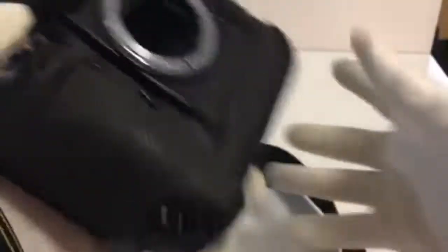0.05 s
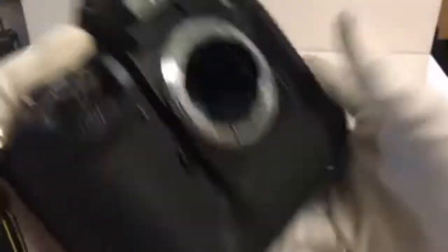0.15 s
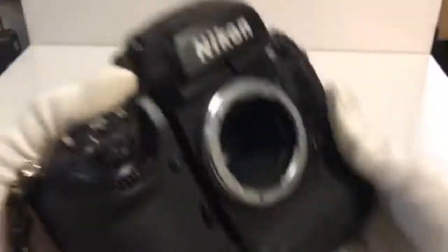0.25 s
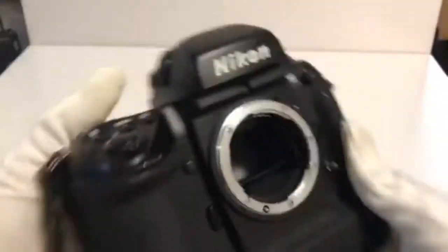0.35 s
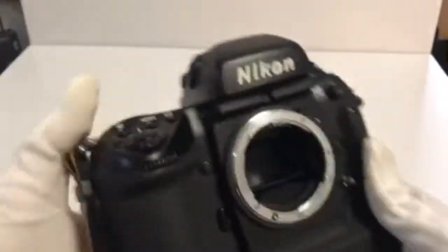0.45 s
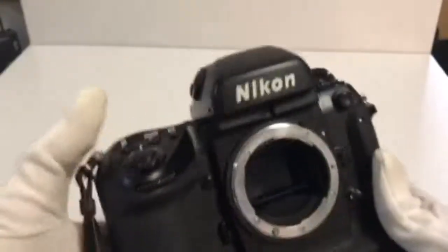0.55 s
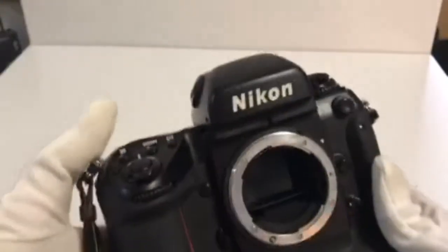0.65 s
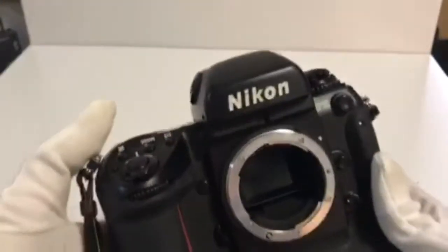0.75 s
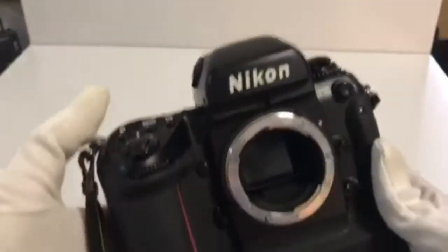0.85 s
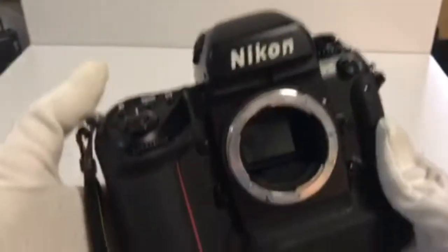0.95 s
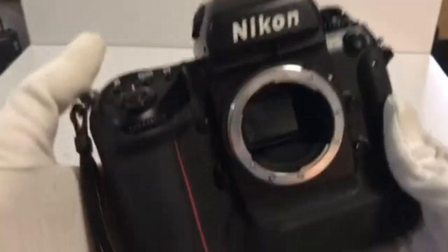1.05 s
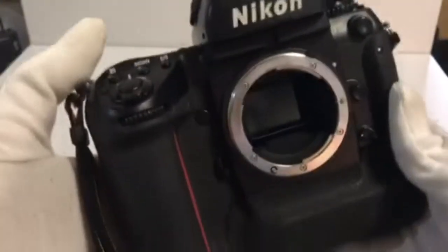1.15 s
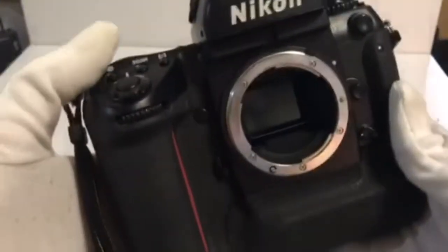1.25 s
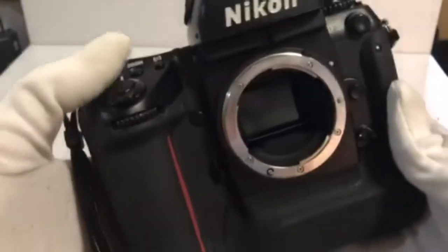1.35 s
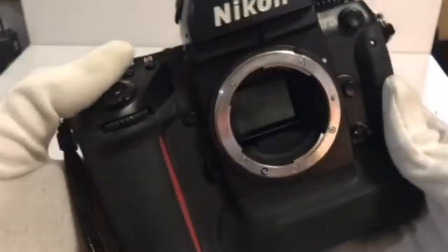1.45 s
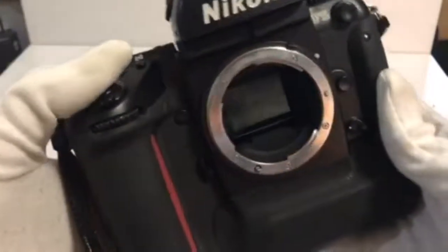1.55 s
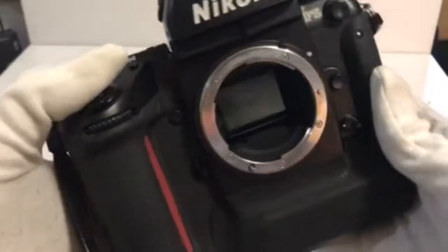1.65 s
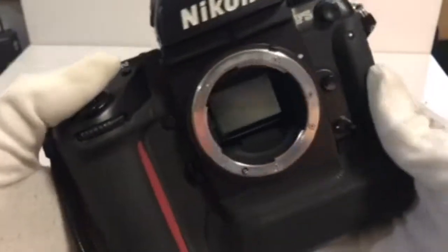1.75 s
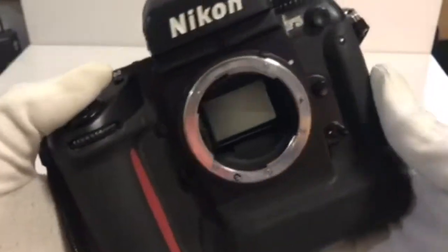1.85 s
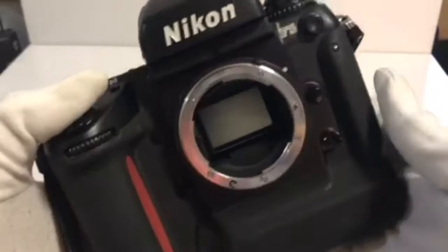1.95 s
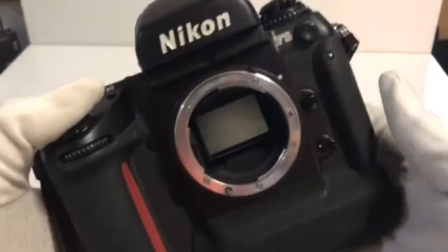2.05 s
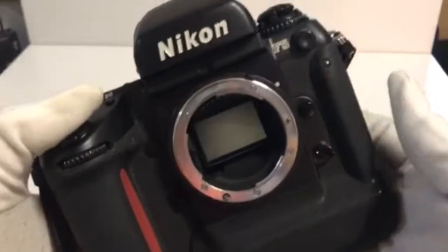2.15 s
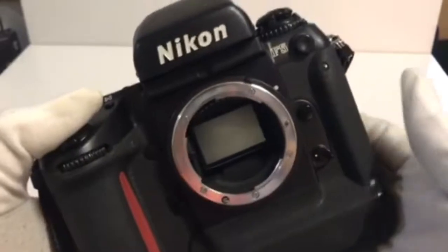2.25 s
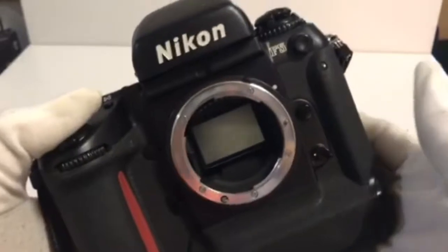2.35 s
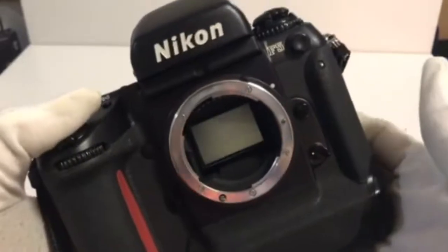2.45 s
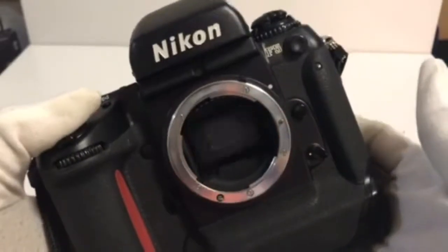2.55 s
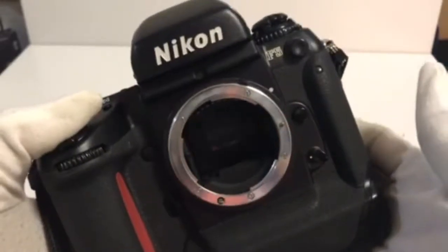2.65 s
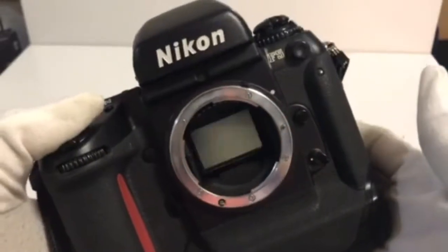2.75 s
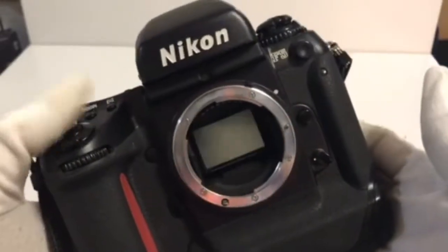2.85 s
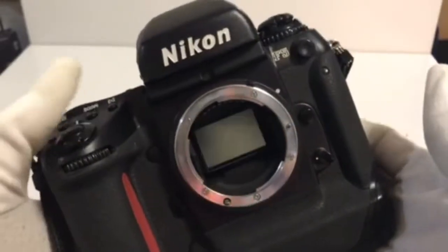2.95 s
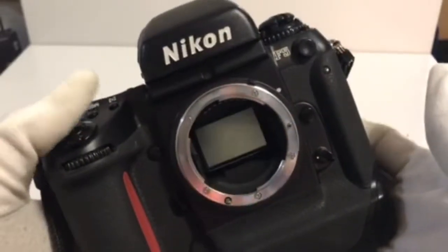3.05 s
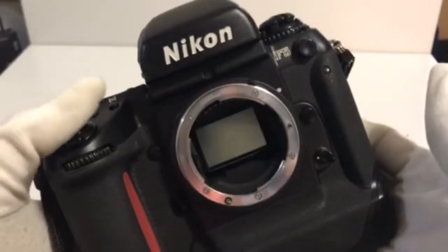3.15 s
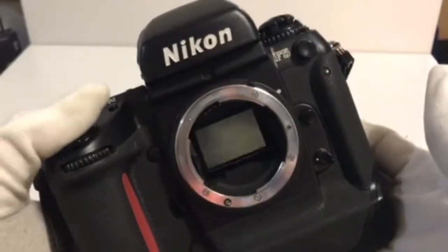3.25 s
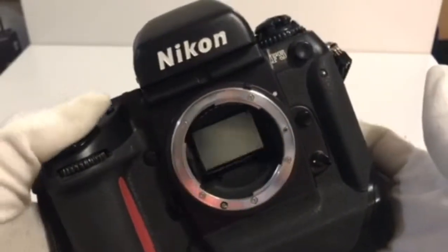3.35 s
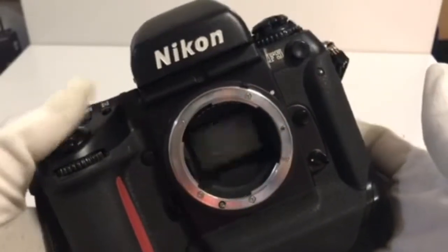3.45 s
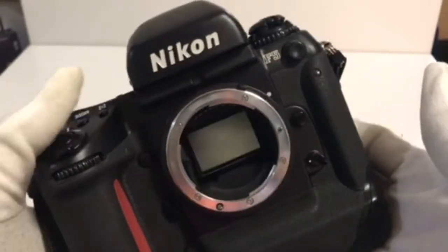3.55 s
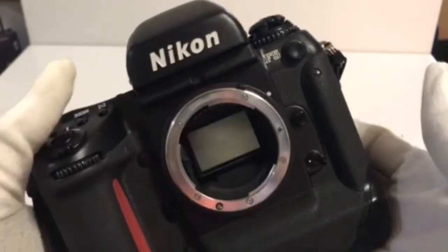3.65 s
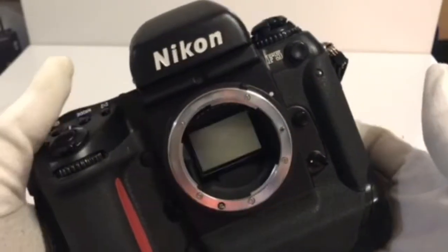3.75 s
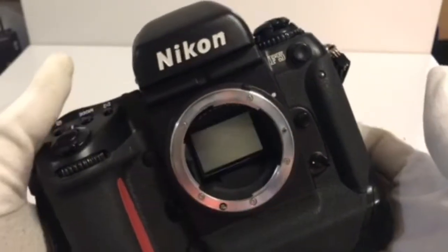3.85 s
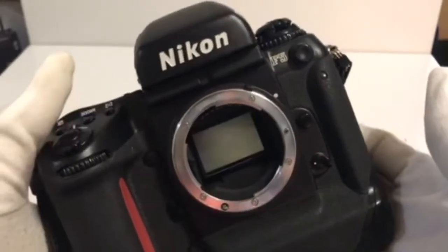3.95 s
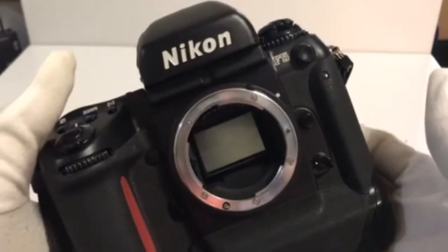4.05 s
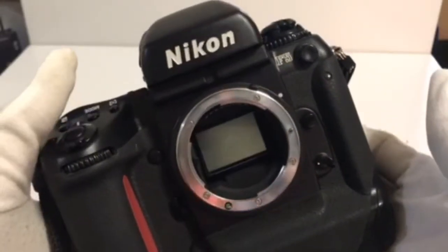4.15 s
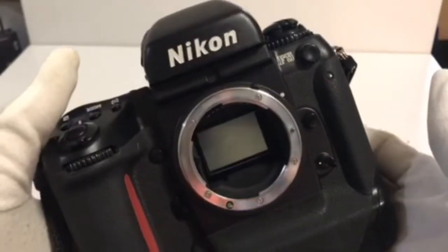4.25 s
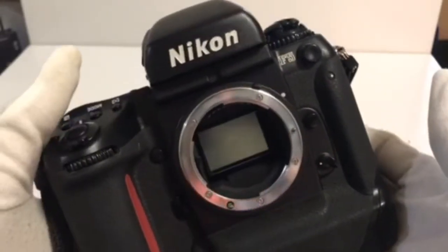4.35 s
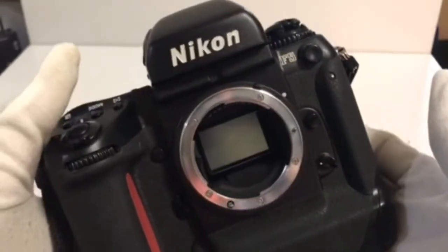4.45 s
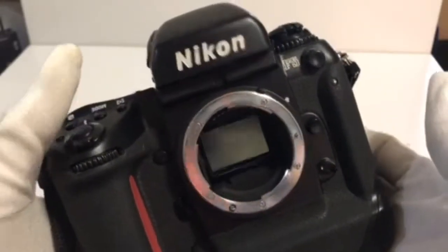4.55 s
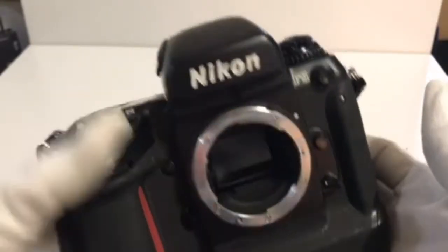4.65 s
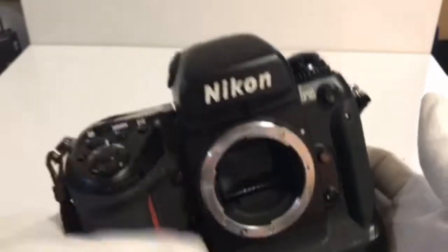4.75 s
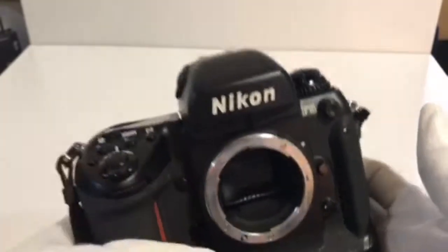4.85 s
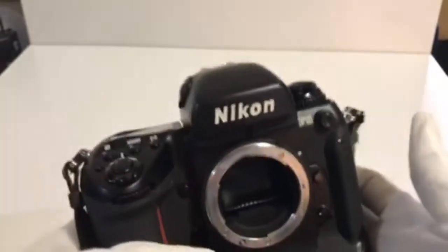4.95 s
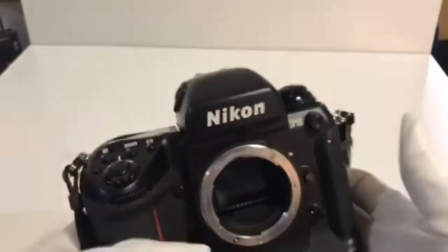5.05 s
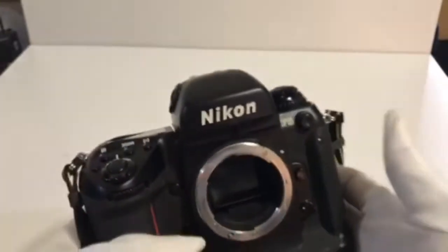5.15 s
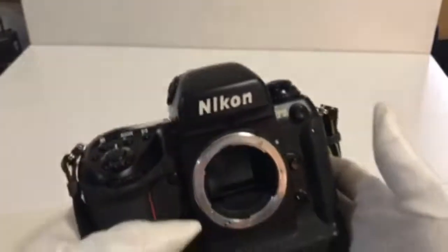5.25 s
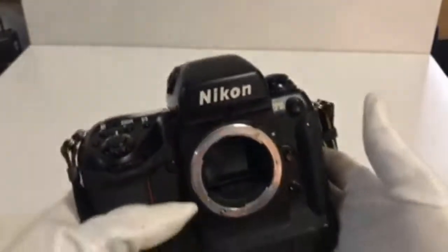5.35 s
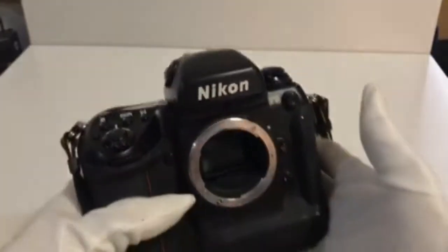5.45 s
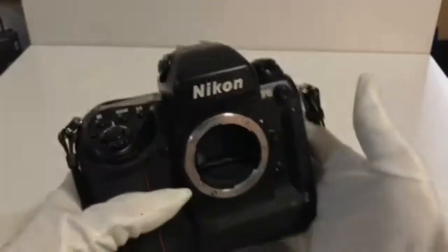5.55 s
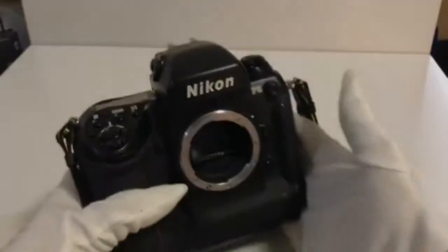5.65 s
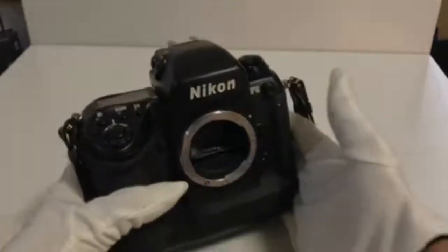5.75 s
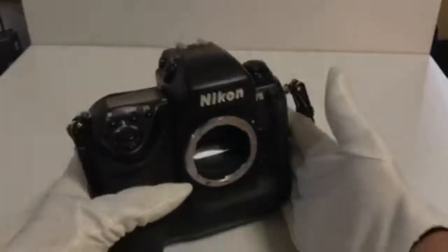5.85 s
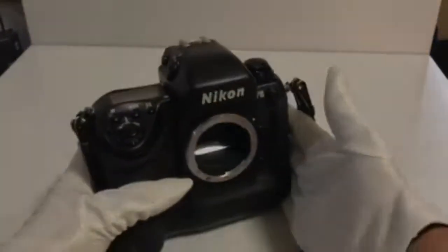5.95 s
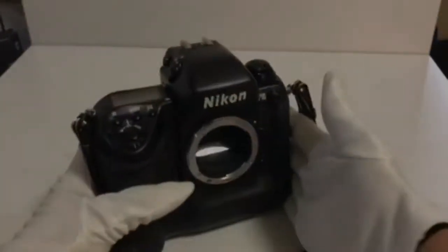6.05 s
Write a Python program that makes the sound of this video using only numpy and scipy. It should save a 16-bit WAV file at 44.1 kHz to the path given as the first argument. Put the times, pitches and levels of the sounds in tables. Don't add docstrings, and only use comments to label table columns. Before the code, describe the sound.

A film camera is handled by gloved hands very near the microphone, over rumbling air and faint hiss. Early rustling and a firm dull knock give way to quiet. A tiny button tick leads into four loud mechanical shutter-and-mirror clatters in quick succession; half a second later come two more. Quiet returns, then soft rubbing, bright little strap-lug ticks and a low thud onto the table, with slight room echo.

```python
import sys
import numpy as np
from scipy import signal
from scipy.fft import rfft, irfft, next_fast_len
from scipy.io import wavfile
from scipy.ndimage import uniform_filter1d

SR = 44100
rng = np.random.default_rng(int(sys.argv[2]) if len(sys.argv) > 2 else 0)


def gain_from_db(level_db):
    decades = np.asarray(level_db, float) / 20
    return 10 ** decades


def persist_wave(psi):
    counts = np.round(np.clip(psi, -1, 1) * 32767).astype(np.int16)
    wavfile.write(sys.argv[1], SR, np.atleast_2d(counts).T)


N = 269010


def rms_one(x):
    return x / np.sqrt(np.mean(x ** 2) + 1e-20)


def band(x, low_hz, high_hz):
    return signal.sosfilt(signal.butter(2, [low_hz, min(high_hz, .45 * SR)], "band", fs=SR, output="sos"), x)


def highpass(x, order, hz):
    return signal.sosfilt(signal.butter(order, hz, "high", fs=SR, output="sos"), x)


def ring(clicks, hz, t60):
    r, w = gain_from_db(-60 / (t60 * SR)), 2 * np.pi * hz / SR
    return signal.lfilter([0, np.sin(w)], [1, -2 * r * np.cos(w), r * r], clicks + 1e-18)


def narrow(hz, width_hz):
    return rms_one(ring(rng.standard_normal(N), hz, np.log(1000) / np.pi / width_hz))


def flicker(low_hz, high_hz):
    return rms_one(band(rng.standard_normal(N), low_hz, high_hz))


# (pitch [Hz], level [dB per Hz])
AIR = [(15, -33), (59, 0.5), (217, -18.5), (734, -32.5), (2160, -34), (4490, -42.5), (5000, -46.5),
       (16000, -49)]
# (pitch [Hz], width [Hz], level [dB])
AIR_HUMPS = [(350, 59, -67.5), (1065, 400, -68)]
# (pitch [Hz], width [Hz])
DUCTS = [(55, 2), (119, 2.4)]
# (time [s], rumble level [dB])
GUSTS = [(0.0, -47.5), (0.28, -46.5), (0.31, -52.5), (0.76, -56), (0.82, -44.5), (1.38, -53.5), (1.49, -66),
         (1.68, -46), (2.5, -50), (2.65, -55), (3.83, -48.5), (3.96, -59), (3.99, -48), (4.29, -45),
         (4.4, -51.5), (4.78, -44.5), (4.9, -56), (5.9, -50)]
# (width [Hz], level [dB])
WHINE = (49, -83.5)
AIR_DB, WHINE_HZ = -56, 4480
HUM_DB, HUM_SWAY_DB = -55.5, 2


def room_tone():
    hz = np.maximum(np.arange(N // 2 + 1) * SR / N, 1)
    air_hz, air_db = np.transpose(AIR)
    colour = gain_from_db(np.interp(np.log(hz), np.log(air_hz), air_db))
    out = gain_from_db(AIR_DB) * rms_one(irfft(rfft(rng.standard_normal(N)) * colour, N))
    for hump_hz, width_hz, db in AIR_HUMPS:
        out += gain_from_db(db) * narrow(hump_hz, width_hz)
    rumble_db = np.interp(np.arange(N) / SR, *np.transpose(GUSTS))
    hum_db = HUM_DB + HUM_SWAY_DB * flicker(1.3, 6.1)
    for level_db, (centre_hz, width_hz) in zip([rumble_db, hum_db], DUCTS):
        tone = narrow(centre_hz, width_hz)
        swell = np.sqrt(uniform_filter1d(tone ** 2, size=3000))
        out += gain_from_db(level_db) * tone / swell
    whine_width_hz, whine_db = WHINE
    return out + gain_from_db(whine_db) * narrow(WHINE_HZ, whine_width_hz)


ROOM_T60_S, WALL_CUT_HZ = .22, 5000


def room(x):
    size = next_fast_len(N + SR)
    w = 2 * np.pi * np.arange(size // 2 + 1) / size
    dull = 1 / (1 + 1j * w * SR / (2 * np.pi * WALL_CUT_HZ)) ** .25
    echo = 0
    for lag in (rng.uniform(0.021, 0.045, 18) * SR).astype(int):
        loop = gain_from_db(-60 * lag / SR / ROOM_T60_S) * dull * np.exp(-1j * w * lag)
        echo = echo + loop / (1 - loop)
    return irfft(rfft(x, size) * echo, size)[:N]


DUCK_S, DUCK_DB = .011, -25


def duck(floor):
    gain = np.ones(N)
    first_touch_s = RELEASE[1][0][0]
    for first in (0, LAST_FRAMES[0] + 1):
        start = round((FRAMES[first][0] + first_touch_s - .004) * SR)
        gain[start - round(DUCK_S * SR):start] = gain_from_db(DUCK_DB)
    hiss = signal.sosfiltfilt(signal.butter(2, 1500, "high", fs=SR, output="sos"), floor)
    return floor + (uniform_filter1d(gain, size=60) - 1) * hiss


# (time of firmest touch [s], rise [s], fall [s], rub level [dB], fine rustle over rub [dB])
STROKES = [(.03, 0.085, 0.094, -68, 0), (.235, 0.0091, 0.053, -72.5, 5.5), (.3, .05, 0.033, -71, -13),
           (.45, 0.086, 0.13, -61.5, 2), (.62, 0.017, 0.036, -71, -1), (.82, .04, 0.026, -77, -7),
           (.92, .03, .04, -78, -5), (1.02, .015, 0.13, -78, -20), (1.41, 0.034, .07, -83.5, 7),
           (1.62, 0.044, .03, -82, -6), (1.845, .02, .03, -81, -2), (4.71, 0.072, .08, -68, -6),
           (4.87, 0.018, 0.11, -74, -8), (5.02, 0.013, 0.078, -70.5, 1), (5.127, 0.0069, 0.092, -69, 1),
           (5.334, 0.054, 0.037, -62.5, 1.5), (5.44, 0.043, 0.058, -70, -3), (5.54, 0.058, 0.047, -70.5, 7),
           (5.6, 0.031, 0.049, -68.5, 3), (5.78, 0.14, 0.087, -70, 6), (5.93, 0.11, 0.088, -60.5, -3)]
# (start time [s], length [s], pitch [Hz], width [Hz], level [dB])
SLIDES = [
    (.78, .17, 6400, 900, -77),
    (4.7, .08, 6500, 1200, -76),
    (5.95, .11, 2900, 900, -63),
    (0.0, .11, 400, 500, -62),
]
HOLD_DB, HOLD_FINE_DB = -81, -87.5
STANDBY_S, STANDBY_DB, STANDBY_FINE_DB = .522, -67, -72.5


def gloves():
    t = np.arange(N) / SR
    rub_level, fine_level = np.full(N, gain_from_db(HOLD_DB)), np.full(N, gain_from_db(HOLD_FINE_DB))
    for s, rise, fall, rub_db, fine_db in STROKES:
        touch = np.exp(-((t - s) / np.where(t < s, rise, fall)) ** 2)
        rub_level += gain_from_db(rub_db) * touch
        fine_level += gain_from_db(rub_db + fine_db) * touch
    ends = [FRAMES[k][0] for k in LAST_FRAMES]
    standby = np.any([(t > end) & (t < end + STANDBY_S) for end in ends], axis=0)
    rub_level += standby * gain_from_db(STANDBY_DB)
    fine_level += standby * gain_from_db(STANDBY_FINE_DB)
    clumps_db = 1.5 * flicker(8, 60) + 1.5 * flicker(60, 400)
    rub = rms_one(band(rng.standard_normal(N), 1600, 8300))
    fine = rms_one(band(rng.standard_normal(N), 7000, 17000))
    out = gain_from_db(0.76 * clumps_db) * rub_level * rub + gain_from_db(clumps_db) * fine_level * fine
    for s, length, hz, width_hz, level_db in SLIDES:
        stroke = np.sin(np.pi * np.clip((t - s) / length, 0, 1)) ** 0.29
        noise = band(rng.standard_normal(N), hz - width_hz / 2, hz + width_hz / 2)
        out += gain_from_db(level_db) * stroke * rms_one(noise)
    return out


# (time [s], peak level [dB], hardness [Hz])
KNOCKS = [
    (.051, -46.5, 300),
    (.5762, -25, 700),
    (.6215, -34, 150),
    (5.826, -38.5, 595),
    (5.853, -39, 600),
]
# (pitch [Hz], level [dB], fade t60 [s])
EDGE = [(127, -6, 0.36), (201, 3, 0.034), (398, 1, 0.022), (483, -5.5, 0.028), (566, -24, 0.066),
        (737, -22, 0.097), (990, -18, 0.047), (1400, -22, 0.035)]
# (time [s], peak level [dB], hardness [Hz])
BUMPS = [
    (5.953, -19, 250),
    (5.976, -27, 89.4),
]
# (pitch [Hz], level [dB], fade t60 [s])
TABLE = [(100, 10.5, 0.2), (147, 13, 0.077), (200, -5, 0.17), (262, -6.5, 0.12), (413, -3, 0.049),
         (626, -1.5, 0.036), (1074, 4.5, 0.011), (1990, 9, 0.008)]


def bumps(hits, modes, grit):
    out, t = np.zeros(N), np.arange(SR // 3) / SR
    for s, peak_db, hard_hz in hits:
        settling = rng.standard_normal(len(t)) * np.exp(-t / 0.017)
        push = (t == 0) + grit * settling
        soft = np.exp(-2 * np.pi * np.clip(hard_hz, 50, 5000) / SR)
        push = signal.lfilter([1 - soft], [1, -soft], push)
        knock = band(sum(gain_from_db(db) * ring(push, hz, t60) for hz, db, t60 in modes), 71, 6500)
        tail = out[round(s * SR):][:len(t)]
        tail += gain_from_db(peak_db + 2.0) * knock[:len(tail)] / np.abs(knock).max()
    return out


# (time [s], peak level [dB], pitch [Hz], second pitch [Hz])
TICKS = [(0.2264, -58, 3660, 3710), (0.2935, -43, 8560, 3570), (0.5134, -49, 2500, 2500),
         (0.617, -53, 1460, 4520), (1.7813, -51.5, 4360, 4300), (4.7133, -49, 10000, 13000),
         (5.004, -42, 12340, 2740), (5.0249, -30, 12100, 5570), (5.1286, -30.5, 12300, 6030),
         (5.226, -55, 12000, 10500), (5.502, -35.5, 6990, 4300), (5.5886, -40.5, 1545, 4040),
         (5.8266, -42.5, 9700, 3710), (5.853, -42, 6660, 6470), (5.9522, -36.5, 2610, 1200)]
# (time [s], peak level [dB], pitch [Hz], second pitch [Hz])
PRESS = [
    (2.4295, -45.5, 6800, 7300),
    (2.432, -62.5, 9000, 4060),
    (3.328, -47, 6770, 7320),
    (4.093, -63.5, 13000, 12200),
]


def ticks():
    out, t = np.zeros(N), np.arange(600) / SR
    for s, peak_db, hz, second_hz in TICKS + PRESS:
        touch = rng.standard_normal(len(t)) * np.exp(-t / 0.0015)
        snap = .6 * rms_one(band(touch, hz / 4.5, hz * 1.7))
        snap += .5 * rms_one(ring(touch, hz, .005))
        snap += .25 * rms_one(ring(touch, second_hz, .008))
        out[round(s * SR):][:len(t)] += gain_from_db(peak_db) * snap / np.abs(snap).max()
    return out


def foam_stop(x):
    return band(band(x, 250, 1700), 250, 1700)


# (time from curtain strike [s], peak level [dB])
SLAPS = [
    (-.0222, -13),
    (.027, -21),
]
BOOM_HZ, BOOM_T60_S, BOOM_DB = 421, 0.017, -5.5


def mirror():
    blows = np.full(N, 1e-18)
    for s, gain_db, _ in FRAMES:
        for lag, peak_db in SLAPS:
            blows[round((s + lag) * SR)] = gain_from_db(gain_db + peak_db + rng.normal())
    one_blow = np.eye(1, 400)[0]
    knock = foam_stop(blows) / foam_stop(one_blow).max()
    boom = band(ring(blows, BOOM_HZ, BOOM_T60_S), 250, 1700)
    return knock + gain_from_db(BOOM_DB) * boom


# (time from curtain strike [s], whirr level [dB])
GEARS = [(-.044, -34), (-.03, -32), (-.012, -43), (.005, -28.5), (.026, -38), (.05, -37), (.078, -42),
         (.112, -39), (.135, -58.5)]
# (low [Hz], high [Hz], level [dB])
GEAR_BANDS = [(287, 1000, -9), (1210, 3200, -2), (2480, 3100, -6.5), (4610, 7200, -0.5), (7740, 8600, -8.5),
              (10600, 15000, -2)]


def gears():
    whirr, t = np.zeros(N), np.arange(N) / SR
    for s, gain_db, _ in FRAMES:
        whirr += gain_from_db(gain_db + np.interp(t - s, *np.transpose(GEARS), left=-200, right=-200))
    teeth = rng.standard_normal((2, N))
    rush = 0
    for k, (low, high, db) in enumerate(GEAR_BANDS):
        rush = rush + gain_from_db(db) * rms_one(band(teeth[k % 2], low, high))
    return whirr * rush


# (time from curtain strike [s], clack level [dB], pitch of struck part [Hz])
RELEASE = (-10, -1, .8), [(-.0429, -15, 1510), (-.0404, -18, 2900), (-.0373, -23, 2070),
           (-.0336, -16, 4200), (-.0258, -28, 7280)]
MIRROR_UP = (-9, 0, .7), [(-.0216, -20, 2240), (-.0191, -25, 2240)]
LINKAGE = (-11, -1, 1), [(-.0151, -29, 6420), (-.0099, -25, 2280), (-.007, -16, 4350), (-.0051, -19, 2240)]
CURTAIN = (-21, -8, .9), [(-.0040, -13, 5800), (-.0024, -11, 4800), (-.0012, -7, 4300)]
MIRROR_DOWN = (-11, 0, 1.6), [(.0223, -26, 2280), (.0259, -19, 3880), (.0286, -13, 3270),
               (.0304, -14, 3450), (.0334, -13, 3320)]
WINDER = (-11, -1, .9), [(.0389, -23, 2540), (.0417, -24, 3270), (.0481, -27, 5080), (.0539, -29, 1890),
          (.0621, -30, 5560), (.0688, -27, 7280), (.082, -21, 3570), (.0886, -16, 2100)]
BRAKE = (-9, -6, .9), [(.1095, -20.5, 1700), (.1139, -31, 1510), (.1179, -30, 3790), (.1211, -34, 1510)]
STAGES = [RELEASE, MIRROR_UP, LINKAGE, CURTAIN, MIRROR_DOWN, WINDER, BRAKE]
# (pitch [Hz], level [dB], fade t60 [s])
CASE = [(300, -5, .014), (430, -2, .013), (620, -4, .01), (820, -3, .009), (1020, -2, .009),
        (1230, 0, .012)]
# (pitch [Hz], level [dB], fade t60 [s])
MECHANISM = [(1500, -7, .04), (2030, -4, .008), (2200, -3, .011), (2600, -2, .009), (3000, -6, .006),
             (3350, 0, .02), (3800, -5, .006), (4100, 1, .011), (4530, -1, .009), (4800, -2, .008),
             (5250, -1, .009), (5750, -4, .006), (6400, 0, .01), (7250, -1, .006)]
# (pitch [Hz], level [dB], fade t60 [s])
SPRINGS = [(8250, -12, .004), (9800, -9, .003), (11600, -6, .004), (12900, -8, .003), (15300, -2, .003)]
# (low [Hz], high [Hz], level [dB])
SNAP = [(203, 2100, -3), (400, 3400, -13), (1420, 2900, -5.5), (2600, 2700, -8), (4440, 14000, -1.5),
        (7500, 11500, 1), (11500, 22000, 3)]
PART_DB = (-1.5, -1.0, -1.0)
THUD_HZ, SIZZLE_HZ = 1350, 8000
OFF_CENTRE_DB = 9.0
LIGHT_TILT = .75
REPEAT = .9


def contacts():
    rows = []
    for (thud_db, sizzle_db, ms), touches in STAGES:
        rows += [(s, db + thud_db, db, db + sizzle_db, hz, ms) for s, db, hz in touches]
    at, *levels_db, centre_hz, rattle_ms = np.transpose(rows)
    lightness_db = np.clip(levels_db[1] - levels_db[0], 0, 12)
    body = CASE + MECHANISM + SPRINGS
    since = np.arange(1100) / SR / (rattle_ms[:, None] / 1000)
    shape = np.minimum(since * 5, 1) * np.exp(-.9 * since)
    same = rng.standard_normal(shape.shape)
    fresh = rng.standard_normal((len(FRAMES), *shape.shape))
    blows = shape * (REPEAT * same + np.sqrt(1 - REPEAT ** 2) * fresh)
    grip_db = 2.2 * rng.standard_normal((len(at), len(body)))
    parts = np.zeros((3, *blows.shape))

    def add(hz, own_db, sound):
        part = int(hz > THUD_HZ) + int(hz > SIZZLE_HZ)
        loss_db = 0 * centre_hz
        if part == 0:
            loss_db = LIGHT_TILT * lightness_db * np.log2(THUD_HZ / hz)
        if part == 1:
            loss_db = OFF_CENTRE_DB * np.abs(np.log2(hz / centre_hz))
        parts[part] += gain_from_db(own_db - loss_db)[:, None] * sound

    for k, (low, high, db) in enumerate(SNAP):
        add(np.sqrt(low * high), db, (-1) ** k * band(blows, low, high))
    for k, ((hz, db, t60), own_db) in enumerate(zip(body, grip_db.T)):
        even = 1.9 / np.sqrt(t60 * SR)
        add(hz, db + 3.5 + own_db, (-1) ** k * ring(blows, hz, t60) * even)
    parts[1] = band(parts[1], THUD_HZ, SIZZLE_HZ * 1.1)
    parts[2] = band(parts[2], SIZZLE_HZ * .9, 19000)
    crest = np.sqrt(uniform_filter1d(parts ** 2, size=45).max(axis=-1).mean(axis=1))
    gain = gain_from_db(np.array(levels_db) + np.array(PART_DB)[:, None]) / crest
    return at, parts * gain[:, None, :, None]


# (time [s], level [dB], extra sizzle of all contacts from the release through the curtains
# [dB])
FRAMES = [
    (2.496, 0.5, 4),
    (2.6337, 0, 2),
    (2.7701, 0, 0.5),
    (2.9068, -0.5, 3),
    (3.393, 0.5, 5),
    (3.53, 0, 2),
]
LAST_FRAMES = (3, 5)
FRAME_SPREAD_DB = 1.0


def camera():
    at, (thud, clack, sizzle) = contacts()
    spread = gain_from_db(FRAME_SPREAD_DB * rng.standard_normal(thud.shape[:2]))
    out = gears()
    for k, (s, gain_db, early_db) in enumerate(FRAMES):
        count = len(at) if k in LAST_FRAMES else len(at) - len(BRAKE[1])
        for j in range(count):
            extra = gain_from_db(early_db * (at[j] < 0))
            sound = thud[k, j] + clack[k, j] + extra * sizzle[k, j]
            out[round((s + at[j]) * SR):][:len(sound)] += gain_from_db(gain_db) * spread[k, j] * sound
    return highpass(out, 4, 190)


ROOM_DB = -26


def scene():
    close = bumps(KNOCKS, EDGE, grit=0.074) + bumps(BUMPS, TABLE, grit=0.029)
    close += ticks() + mirror() + camera()
    floor = duck(room_tone() + gloves())
    return (close + gain_from_db(ROOM_DB) * room(close) + floor)[None]


def top_cut(x):
    return signal.sosfilt(signal.butter(12, 17040, fs=SR, output="sos"), x)


def record(dry):
    x = highpass(np.clip(dry, -.85, .85), 3, 42)
    x = signal.sosfilt(signal.ellip(10, .1, 55, 15800, fs=SR, output="sos"), x)
    return top_cut(x)


dry = scene()
out = record(dry)
persist_wave(out)
```